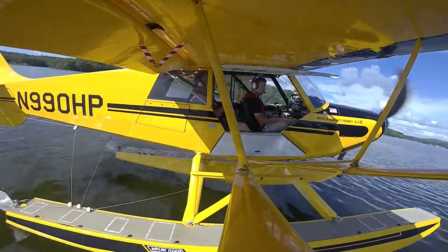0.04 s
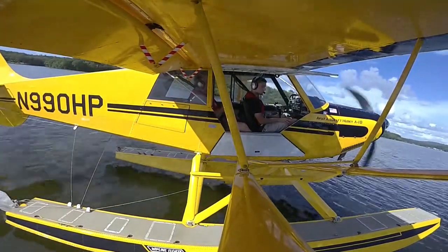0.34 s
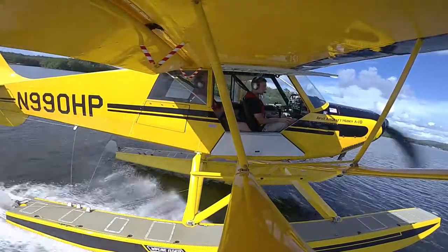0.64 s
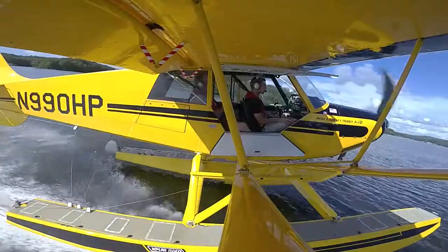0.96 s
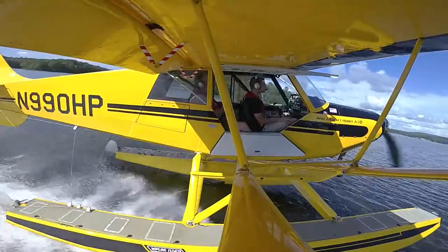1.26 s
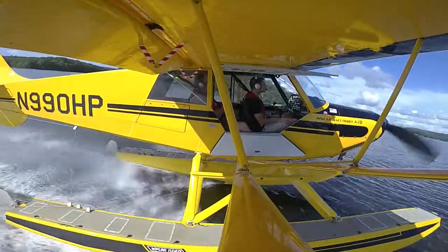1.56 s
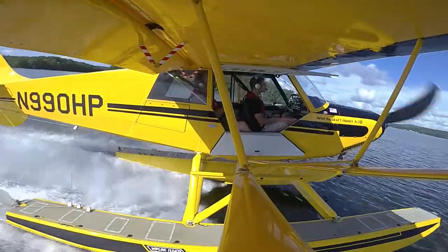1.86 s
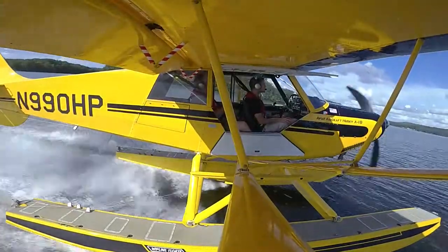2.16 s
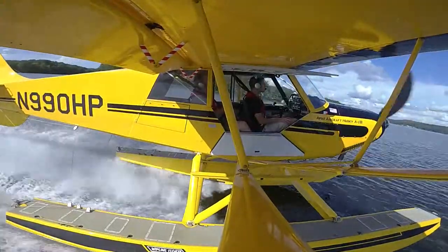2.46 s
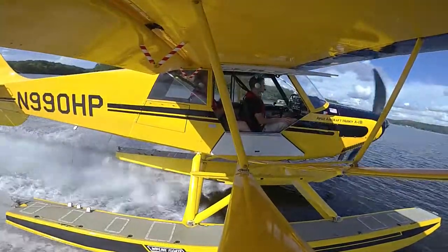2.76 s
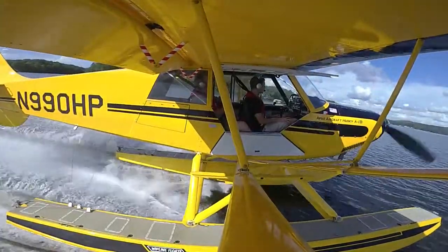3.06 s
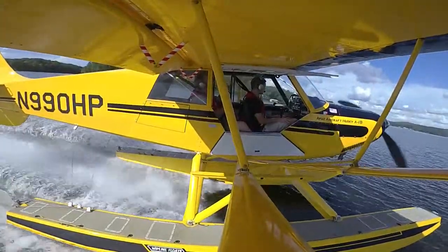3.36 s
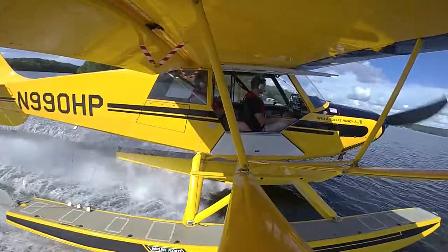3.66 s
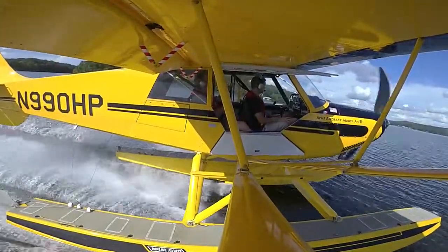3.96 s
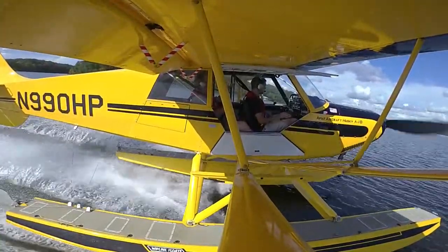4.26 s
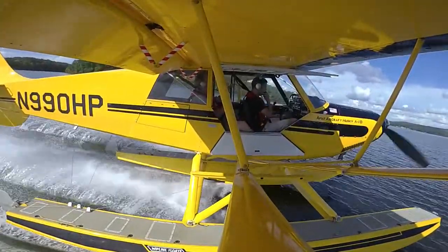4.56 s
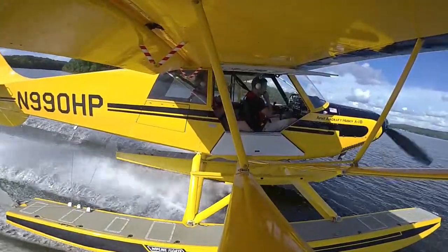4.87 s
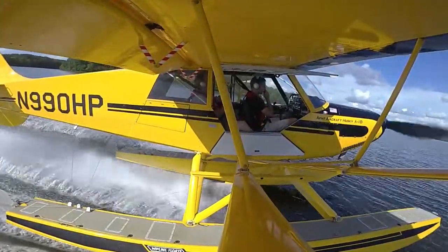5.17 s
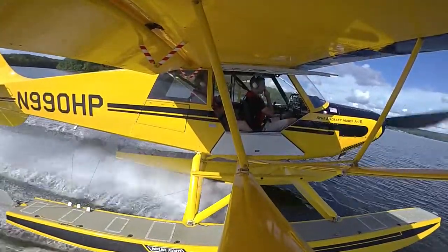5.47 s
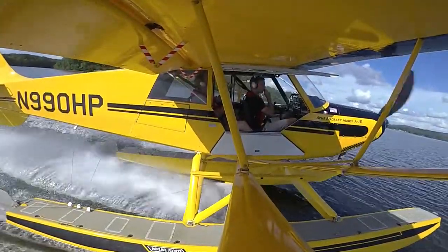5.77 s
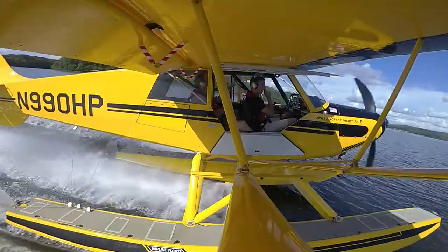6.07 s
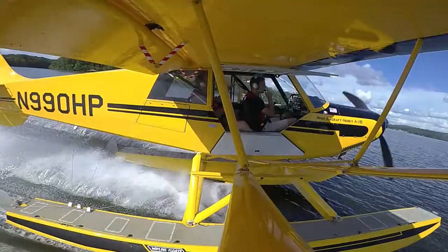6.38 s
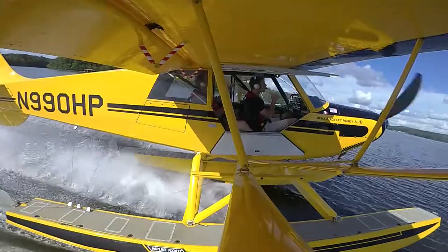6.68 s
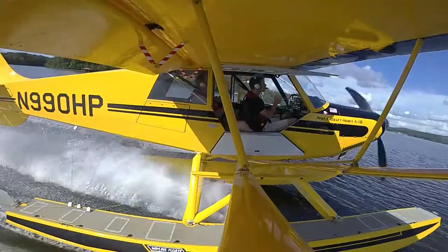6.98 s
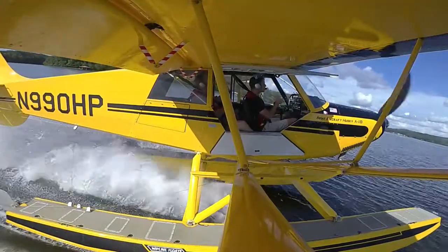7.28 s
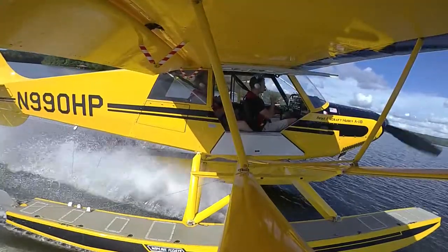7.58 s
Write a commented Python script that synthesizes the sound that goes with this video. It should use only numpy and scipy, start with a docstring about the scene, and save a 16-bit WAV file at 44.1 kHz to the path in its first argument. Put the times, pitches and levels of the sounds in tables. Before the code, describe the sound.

A small floatplane makes its take-off run across a lake, heard from a microphone fixed under the wing. A low drone throbs inside a gusty roar of propeller wash, with booming thumps and hissing spray off the floats. The drone rises a little, then slowly sinks as the wind steadies and the spray grows louder. A few drops knock on the microphone housing, and a faint warbling whistle joins near the end.

```python
"""A low drone and a gusty roar come first: a floatplane on its take-off run over a lake, heard from a
camera fixed under the wing. Propeller wash and slipstream build, thump and break off, then steady;
they ring the camera's mount and housing, and the drone throbs with each gust as its pitch rises and sinks.
Spray hisses off the floats, air squeals briefly over an edge, and a few drops knock on the housing.
At speed a swaying whistle starts."""
import sys
import numpy as np
from scipy import signal
from scipy.fft import rfft, irfft, next_fast_len
from scipy.io import wavfile
from scipy.ndimage import uniform_filter1d

SR = 44100
rng = np.random.default_rng(int(sys.argv[2]) if len(sys.argv) > 2 else 0)


def dump(signal):
    """Clip the signal to [-1, 1] and save it as 16-bit WAV at the path in sys.argv[1]."""
    limited = np.clip(np.atleast_2d(signal).T, -1, 1)
    pcm = np.round(limited * 32767).astype(np.int16)
    wavfile.write(sys.argv[1], SR, pcm)


N = 336483
TIME = np.arange(N) / SR


def undb(db):
    """Decibels to gain."""
    return 10 ** (np.asarray(db) / 20)


def unit(x):
    """Scale to rms 1."""
    return x / np.sqrt(np.mean(x ** 2))


def curve(rows):
    """An automation lane: straight lines between (time, value) rows."""
    return np.interp(TIME, *np.transpose(rows))


def filtered(x, gain_at):
    """Apply a gain given as a function of frequency; rms 1."""
    size = next_fast_len(N, True)
    hz = np.fft.rfftfreq(size, 1 / SR) + 1
    return unit(irfft(rfft(x, size) * gain_at(hz), size)[:N])


def drift(rate):
    """Smooth random modulation with rms 1 and about `rate` new values a second."""
    return filtered(rng.standard_normal(N), lambda hz: 1 / (1 + (2 * hz / rate) ** 4))


def colour(x, eq, modes=()):
    """Pass x through an EQ curve lifted by resonances; rms 1."""
    eq_hz, eq_db = np.transpose(eq)

    def gain_at(hz):
        db = np.interp(np.log(hz), np.log(eq_hz), eq_db)
        db += sum(lift / (1 + (2 * (hz - centre) / width) ** 2) for centre, width, lift in modes)
        return undb(db) / (1 + (.5 * hz / eq_hz[-1]) ** 4)  # rolls off above the last point
    return filtered(x, gain_at)


def even(x, span_s):
    """Level out the slow swells of a noise and keep its quick grain."""
    power = uniform_filter1d(x ** 2, int(span_s * SR))
    return x / np.sqrt(np.maximum(power, 1e-6))


def tilt(x, pivot_hz, db):
    """Tilt EQ: raise the treble against the bass by a moving number of dB."""
    bass = signal.sosfiltfilt(signal.butter(2, pivot_hz, fs=SR, output="sos"), x)
    return bass * undb(-db / 2) + (x - bass) * undb(db / 2)


def placed(sound, start_s, peak_db):
    """A one-shot set into silence at the given time and peak."""
    return np.pad(sound * undb(peak_db) / np.abs(sound).max(), (int(start_s * SR), N))[:N]


def swells(crests_s, db, rise_s, fall_s, order=2):
    """Summed power of rise-and-fall envelopes; a higher order gives flatter tops and steeper sides."""
    t = TIME[::32]
    since = t - crests_s[:, None]
    span_s = np.where(since < 0, np.reshape(rise_s, (-1, 1)), fall_s)
    powers = undb(db[:, None]) ** 2 * np.exp(-np.abs(since / span_s) ** order)
    return np.interp(TIME, t, powers.sum(axis=0))


# the drone's glide (time [s], pitch [Hz])
DRONE_GLIDE = [(0, 100), (.35, 108), (.6, 122), (.85, 122), (1.22, 116.5), (1.7, 121), (2.3, 124),
               (2.85, 120), (3.33, 124), (3.8, 111), (4.4, 107), (5, 97), (5.55, 88.5), (6.5, 85),
               (7.4, 75), (7.63, 80)]
# the drone's bed between gusts (time [s], level [dB])
DRONE_BED = [(0, -22), (1, -43), (3.8, -37), (4.3, -20.5), (5.4, -31.5), (5.8, -26), (6.8, -22),
             (7.3, -23.5), (7.63, -28.5)]
def drone(throb_power, wander_rad=.13, waver_db=2.03):
    """One low tone that throbs with the gusts; its phase wanders in the turbulent air."""
    phase = 2 * np.pi * np.cumsum(curve(DRONE_GLIDE)) / SR + wander_rad * drift(27)
    envelope = np.sqrt(undb(curve(DRONE_BED)) ** 2 + throb_power)
    return np.sqrt(2) * np.sin(phase) * envelope * undb(waver_db * drift(39))


# sub-heavy tone of wind on the microphone (frequency [Hz], relative level [dB])
BUFFET_EQ = [(10, -35), (20, -7), (28, -8), (37, 2.5), (50, 2.5), (68, -7), (100, -8), (200, -38)]
# the rumble between thumps, growing with speed (time [s], level [dB])
BUFFET_BED = [(0, -34), (3, -34), (4.5, -24.5), (7.63, -24.5)]
def wind_buffet(thump_power, waver_db=1.5):
    """Big eddies rumble and thump on the microphone."""
    eddies = even(colour(rng.standard_normal(N), BUFFET_EQ), span_s=.15)
    envelope = np.sqrt(undb(curve(BUFFET_BED)) ** 2 + thump_power)
    return eddies * envelope * undb(waver_db * drift(26))


# boomy tone of the shaking mount (frequency [Hz], relative level [dB])
SHAKE_EQ = [(50, -14), (80, -11), (105, -4.5), (150, -1.5), (200, -4), (240, -13), (300, -23), (400, -34.5),
            (800, -53)]
# where the mount rings (centre [Hz], width [Hz], boost [dB])
MOUNT_RESONANCES = [(122.1, 25, 6), (196, 18, 1), (277, 11, 5.5), (334, 18.4, 6)]
# the shake between gusts (time [s], level [dB])
SHAKE_BED = [(0, -20.5), (.6, -24), (1.5, -27), (2.6, -28), (3.9, -24), (5.7, -19.5), (6.8, -23.5),
             (7.63, -20)]
def mount_shake(rush_db, gust_depth=.94, shudder_db=.95):
    """Smaller eddies make the camera mount boom, harder in each gust."""
    boom = even(colour(rng.standard_normal(N), SHAKE_EQ, MOUNT_RESONANCES), span_s=.1)
    return boom * undb(curve(SHAKE_BED) + gust_depth * rush_db + shudder_db * drift(36))


# dark tone of propeller and slipstream (frequency [Hz], relative level [dB])
ROAR_EQ = [(120, 1.5), (280, 3), (400, 0), (650, -5), (1000, -7), (1300, -15.5), (2200, -20), (2900, -18.5),
           (3500, -26.5), (4500, -32), (7000, -40.5), (15000, -47)]
# where the housing rings (centre [Hz], width [Hz], boost [dB])
HOUSING_RESONANCES = [(527, 110, 5.3), (791, 138, 7.3), (1065, 140, 4.5), (1655, 500, 8.15),
                      (2520, 80, 4.9), (3060, 305, 8.6)]
# weight of the roar's low end (time [s], bass against treble [dB])
ROAR_WEIGHT = [(0, 0), (.7, 3.5), (1.5, 0.5), (2.3, 2), (3, 2.5), (3.8, 0), (4.6, 0), (5.5, -2), (6.3, -4),
               (7.6, -4)]
# the roar's fader between gusts (time [s], gain [dB])
ROAR_BED = [(0, -31.5), (0.25, -36), (1.45, -41), (2.15, -41.5), (2.9, -41.5), (3.15, -38.5), (3.65, -41.5),
            (4.2, -35), (7.63, -34.5)]
def roar(flutter, rush_db, waver_db=.59):
    """Turbulent propeller wash, torn into short bursts, rings the camera housing."""
    bursts = rng.standard_normal(N) * undb(.76 * flutter + 1.16 * drift(460) + waver_db * drift(20))
    wash = colour(bursts, ROAR_EQ, HOUSING_RESONANCES)
    return tilt(wash, pivot_hz=570, db=-curve(ROAR_WEIGHT)) * undb(curve(ROAR_BED) + rush_db)


# a breathy high note in the spray (time [s], gain ahead of the spray's fader [dB])
SINGING_BLEND = [(0, -12), (.8, -10), (1.3, -8.5), (1.7, -8.5), (2, -10), (2.35, -8), (2.7, -12),
                 (3.1, -24), (4, -24), (7.63, -25)]
def singing(centre_hz=4980, width_hz=380, waver_db=3):
    """Air noise caught in one narrow resonance; it comes and goes."""
    band = filtered(rng.standard_normal(N), lambda hz: 1 / (1 + (2 * (hz - centre_hz) / width_hz) ** 2))
    return band * undb(curve(SINGING_BLEND) + waver_db * drift(50))


# bright tone of the spray (frequency [Hz], relative level [dB])
SPRAY_EQ = [(2500, -3.5), (4000, -7), (4600, -2), (6200, -3.5), (6800, -8.5), (7500, -6), (8100, 1.5),
            (9500, 0.5), (11200, -1.5), (12200, -6), (13500, -13), (15000, -18)]
# peaks in the hiss (centre [Hz], width [Hz], boost [dB])
SPRAY_RESONANCES = [(5000, 380, 3), (7900, 250, 1.8), (11000, 660, 2.3)]
# fineness of the mist: finer is brighter (time [s], treble against bass [dB])
MIST_BRIGHTNESS = [(0, 6), (.8, 8), (1.4, 7), (2, 5), (2.2, 5), (2.8, -3.5), (3.5, -9), (4.5, -5.5),
                   (5.5, -4), (6.5, -2), (7.6, -3)]
# the spray's fader between gusts (time [s], gain [dB])
SPRAY_BED = [(0, -49), (0.25, -52.5), (0.8, -57), (1.5, -58.5), (1.9, -55), (2.15, -56.5), (2.9, -58.2),
             (3.15, -57.5), (3.65, -59.5), (4.2, -51.5), (4.8, -51), (5.05, -52), (5.7, -49), (7.63, -47)]
def spray(flutter, rush_db, gust_depth=1.04):
    """Countless droplets of uneven size hiss off the floats, and a narrow band sings along."""
    droplets = rng.standard_normal(N) * undb(.89 * flutter + 1.4 * drift(2500))
    hiss = colour(droplets, SPRAY_EQ, SPRAY_RESONANCES)
    hiss = tilt(hiss, pivot_hz=9100, db=curve(MIST_BRIGHTNESS))
    return (hiss + singing()) * undb(curve(SPRAY_BED) + gust_depth * rush_db)


# gusts of slipstream
# (crest time [s], build-up [s], rush against the steady flow [dB], thump [dB], drone throb [dB])
GUST_CUES = [(0.133, 0.091, 3, -28, -21), (0.248, 0.066, 4.5, -37, -23), (0.319, 0.083, 4.5, -31, -30),
             (0.39, 0.065, 3, -20, -18.5), (0.494, 0.065, 4, -30, -19), (0.573, 0.058, 5.5, -31, -24.5),
             (0.707, 0.064, 8, -26, -20.5), (0.817, 0.064, 4, -29, -20), (0.922, 0.084, 6, -20, -18),
             (1.064, 0.07, 4.5, -30, -17), (1.143, 0.1, 4, -36, -21), (1.239, 0.082, 7.5, -32, -15),
             (1.295, 0.08, 2, -34, -28), (1.389, 0.056, 7.5, -22, -15), (1.517, 0.054, 4, -30, -15),
             (1.65, 0.044, 2.0, -21, -21.5), (1.746, 0.078, 6, -17, -18), (1.887, 0.072, 9, -22, -23),
             (1.961, 0.054, 9, -22, -23), (2.021, 0.078, 6.0, -25, -16), (2.12, 0.049, 4, -27, -17),
             (2.256, 0.047, 6.5, -38, -14.5), (2.336, 0.052, 3.5, -21.5, -25),
             (2.443, 0.072, 6.5, -23, -17.5), (2.583, 0.099, 3, -27, -15), (2.677, 0.018, -1, -37, -17),
             (2.79, 0.042, 6.5, -22, -19.5), (2.887, 0.076, 5.5, -23, -15.5), (3.062, 0.079, 7.5, -22, -21),
             (3.184, 0.062, 1.5, -18, -19), (3.256, 0.15, 6.5, -22, -19.5), (3.337, 0.097, 1, -26, -21),
             (3.402, 0.052, 2.5, -33, -19.5), (3.516, 0.051, 0.0, -28, -16), (3.594, 0.076, 7, -21, -18),
             (3.762, 0.066, 6.0, -21, -22), (3.855, 0.074, 6, -22, -20), (3.99, 0.044, 4, -26, -18.5),
             (4.065, 0.054, -4.5, -22, -40), (4.144, 0.074, 1, -14, -22), (4.37, 0.038, -10, -31, -31),
             (4.518, 0.16, -2.5, -18, -23), (4.777, 0.11, 1.5, -31, -20), (4.921, 0.18, -2, -27, -15.5),
             (5.196, 0.031, -7, -33, -34), (5.326, 0.071, 0.0, -16, -32), (5.492, 0.1, -0.5, -22, -30),
             (5.724, 0.11, -3.5, -28, -17.5), (5.826, 0.12, -5.5, -24, -21), (6.143, 0.032, -10, -28, -30),
             (6.222, 0.064, -5, -27, -23), (6.351, 0.094, -1.5, -19, -17.5), (6.625, 0.073, -5, -17, -42),
             (6.832, 0.02, -15, -20, -26), (6.955, 0.015, -9, -24, -25), (7.065, 0.06, -18, -24, -31),
             (7.217, 0.1, -2.5, -15.5, -18), (7.426, 0.11, -3, -15.5, -21)]
def gusts(thump_lead_s=.005, throb_lead_s=.003):
    """Three envelopes from each gust: a rush that builds and breaks off, a thump, a lingering throb."""
    crest_s, build_s, rush_db, thump_db, throb_db = np.transpose(GUST_CUES)
    rush_power = swells(crest_s, rush_db, rise_s=build_s, fall_s=.013, order=4)
    thump_power = swells(crest_s - thump_lead_s, thump_db, rise_s=.019, fall_s=.019)
    throb_power = swells(crest_s - throb_lead_s, throb_db, rise_s=.028, fall_s=.042)
    return 10 * np.log10(1 + rush_power), thump_power, throb_power


# brief squeals of air (crest time [s], pitch [Hz], level [dB])
SQUEAL_CUES = [(.075, 2950, -51), (.455, 2940, -44.5)]
def squeals(fade_db_per_s=127):
    """Air over an edge gives nearly pure tones that swell, tremble and fade."""
    tremble = .3 * drift(120)
    tones = 0
    for crest_s, hz, db in SQUEAL_CUES:
        envelope = undb(db - fade_db_per_s * np.abs(TIME - crest_s))
        tones += np.sin(2 * np.pi * hz * TIME + tremble) * envelope
    return np.sqrt(2) * tones * undb(drift(80))


# drops hitting the housing (time [s], peak ahead of the low-pass [dB], ring [Hz])
DROP_HITS = [(.120, -24.5, 2940), (3.027, -26, 710), (3.24, -28, 2600), (5.123, -24.5, 794),
             (6.413, -29, 2480), (6.909, -36, 1500), (6.949, -19.5, 883), (7.246, -31, 2400),
             (7.293, -31, 2540), (7.486, -24.5, 851)]
def drops(muffle_hz=3600):
    """Each drop is a knock of two or three cycles with a noisy splash; the housing dulls the treble."""
    t = np.arange(2048) / SR
    splash_envelope = np.exp(-t / .003) * (1 - np.exp(-t / .0015))
    hits = 0
    for start_s, db, hz in DROP_HITS:
        octave = signal.butter(2, [hz / np.sqrt(2), hz * np.sqrt(2)], "bandpass", fs=SR, output="sos")
        splash = signal.sosfilt(octave, rng.standard_normal(len(t)) * splash_envelope)
        knock = np.sin(2 * np.pi * hz * t) * hz * t * np.exp(-hz * t)
        hits += placed(unit(knock) + unit(splash), start_s, db)
    return signal.sosfilt(signal.butter(6, muffle_hz, fs=SR, output="sos"), hits)


# hard gusts that slap the mount (time [s], peak [dB])
SLAP_HITS = [(0.13, -10), (.575, -10), (0.703, -11), (1.885, -10), (1.955, -22), (2.43, -14), (3.052, -4.5)]
def slaps(ring_hz=140, decay_s=.018, attack_s=.00087, crack_gain=.19, crack_s=.004):
    """A gust hits: a crack of roar for the transient, a few cycles of booming mount for the body."""
    t = np.arange(8192) / SR
    wash = colour(rng.standard_normal(N), ROAR_EQ, HOUSING_RESONANCES)
    boom = np.sin(2 * np.pi * ring_hz * t) * np.exp(-t / decay_s)
    attack = 1 - np.exp(-t / attack_s)
    hits = 0
    for start_s, db in SLAP_HITS:
        crack = crack_gain * wash[int(start_s * SR):][:len(t)] * np.exp(-t / crack_s)
        hits += placed(attack * (boom + crack), start_s, db)
    return hits


# the whistle at the top of its swing, from its first crest on (time [s], pitch [Hz], level [dB])
WHISTLE_TOPS = [(5.29, 6470, -56), (6, 6360, -62), (6.2, 6300, -53), (7.63, 6370, -54)]
def whistle(sway_hz=13.02, slowing_hz_per_s=.37, swing_hz=2300, duck_db=19, stray_hz=35, waver_db=1.7):
    """An edge tone that sways quickly in pitch and speaks only near the top of each swing."""
    since = TIME - WHISTLE_TOPS[0][0]
    sway_cycles = sway_hz * since - slowing_hz_per_s * since ** 2 / 2
    dip = np.sin(np.pi * sway_cycles) ** 2  # 0 at the top of a swing, 1 at the bottom
    times_s, top_hz, top_db = np.transpose(WHISTLE_TOPS)
    hz = np.interp(TIME, times_s, top_hz) + stray_hz * drift(12) - swing_hz * dip
    tremble = .55 * drift(700)
    tone = np.sqrt(2) * np.sin(2 * np.pi * np.cumsum(hz) / SR + tremble)
    level_db = np.interp(TIME, times_s, top_db) + waver_db * drift(40) - duck_db * dip
    return tone * undb(level_db) * (sway_cycles > -.5)  # enters half a sway before its first crest


def scene():
    """The mono mix: shared gusts drive the beds, and one quick flutter of air shakes roar and spray."""
    flutter = drift(83)
    rush_db, thump_power, throb_power = gusts()
    low_end = drone(throb_power) + wind_buffet(thump_power) + mount_shake(rush_db) + slaps()
    air = roar(flutter, rush_db) + squeals() + whistle()
    water = spray(flutter, rush_db) + drops()
    return (low_end + air + water)[None]


def record(dry):
    """The camera cuts the top end with a steep low-pass."""
    cutoff_hz = 14900
    return signal.sosfilt(signal.ellip(8, .2, 70, cutoff_hz, fs=SR, output="sos"), dry)


dry = scene()
out = record(dry)
dump(out)
```